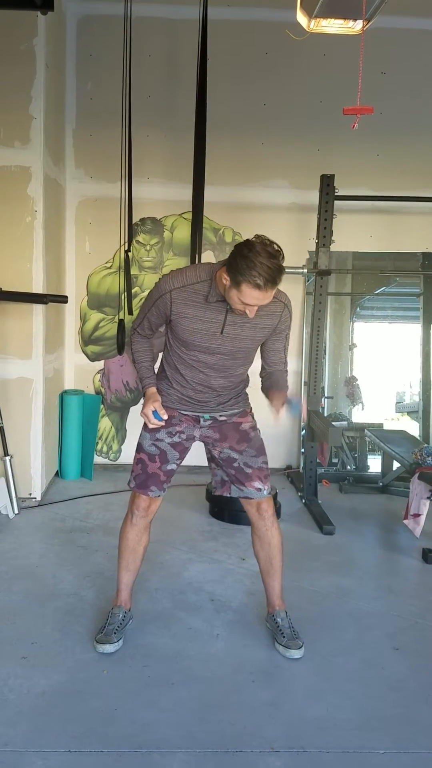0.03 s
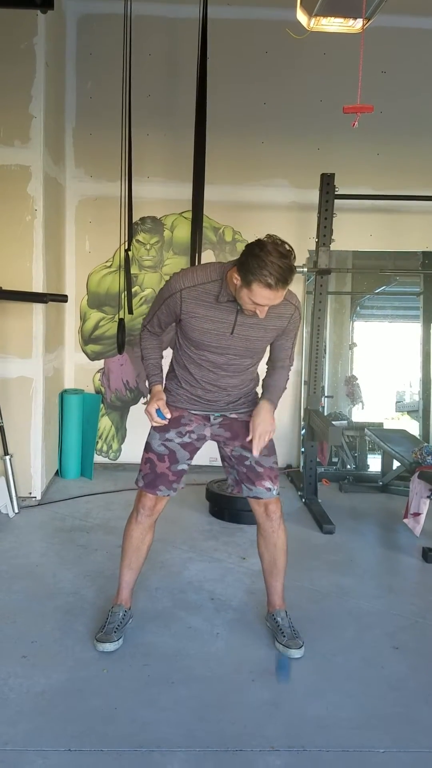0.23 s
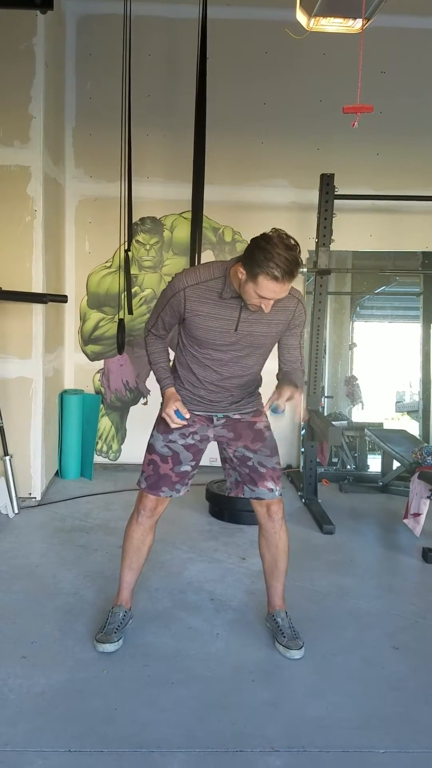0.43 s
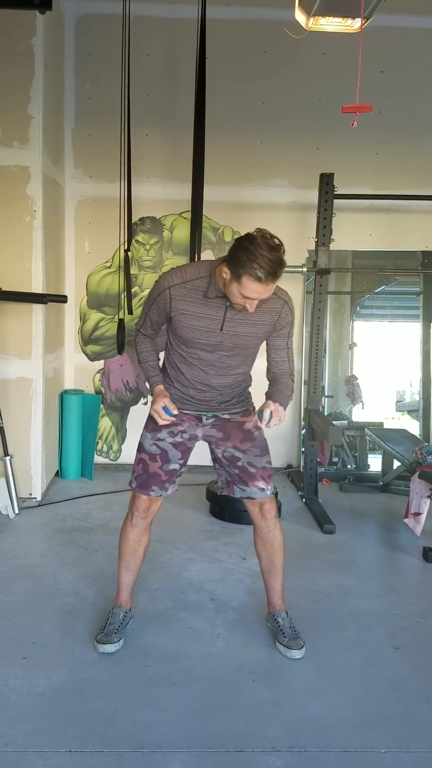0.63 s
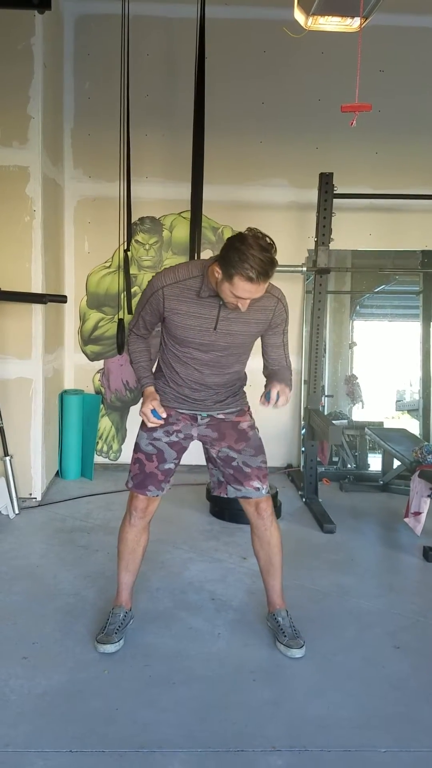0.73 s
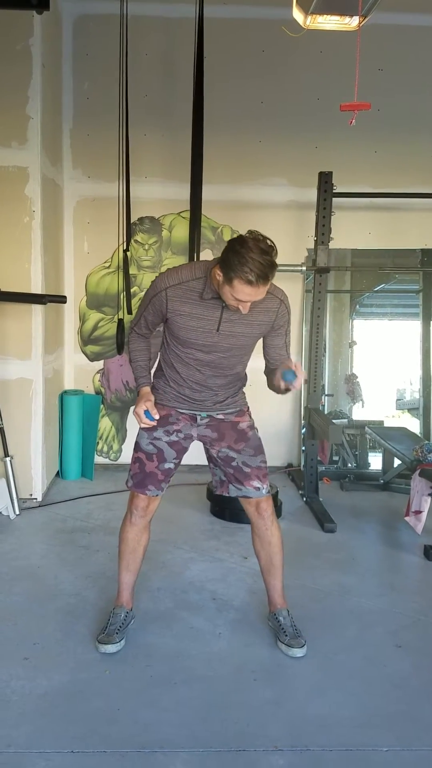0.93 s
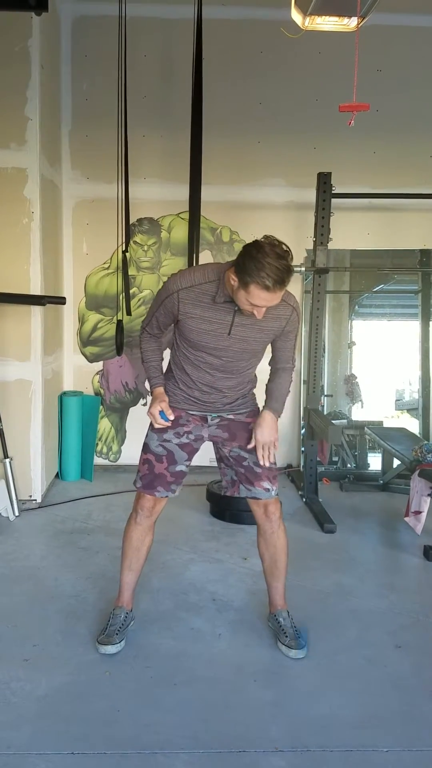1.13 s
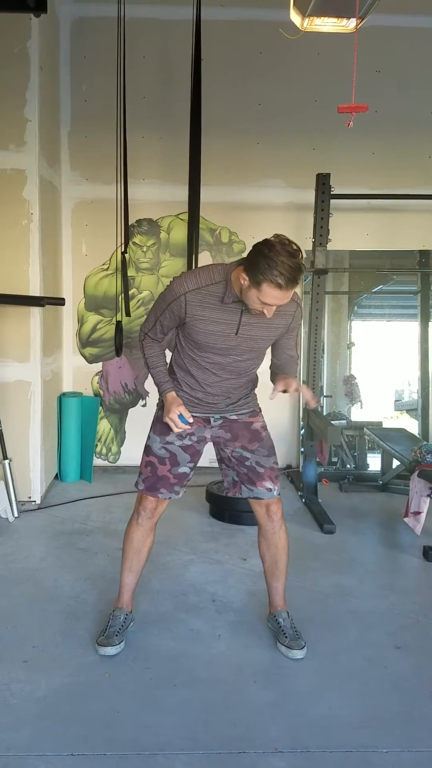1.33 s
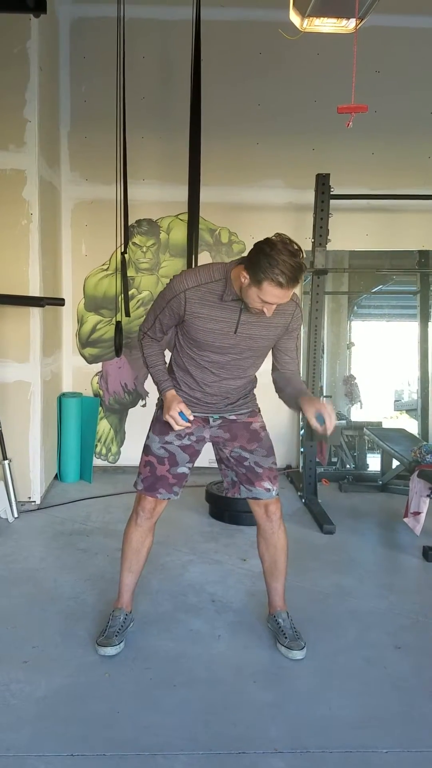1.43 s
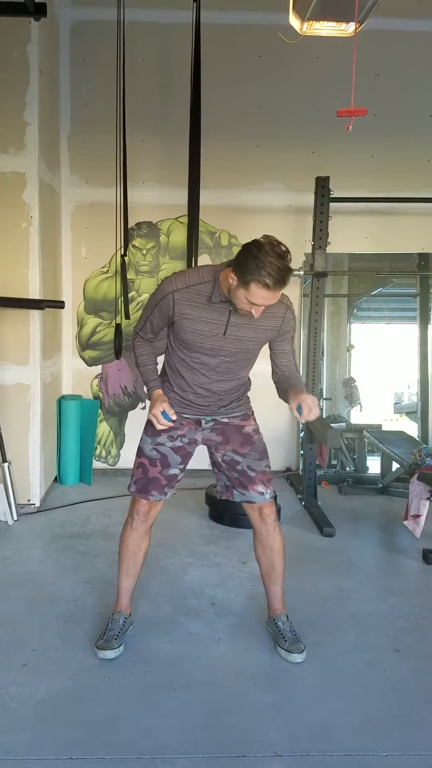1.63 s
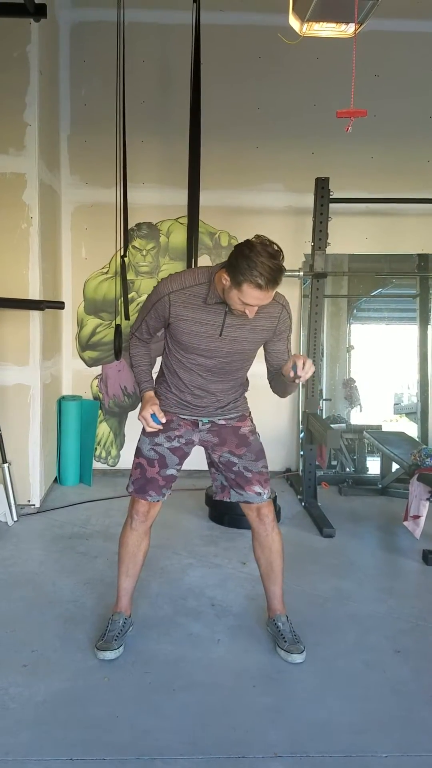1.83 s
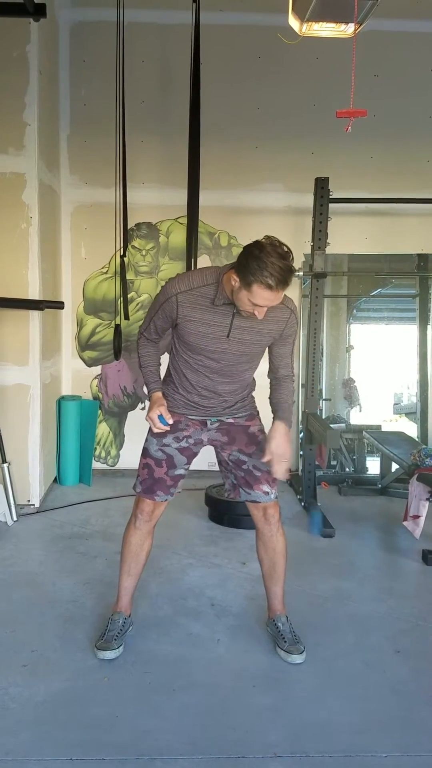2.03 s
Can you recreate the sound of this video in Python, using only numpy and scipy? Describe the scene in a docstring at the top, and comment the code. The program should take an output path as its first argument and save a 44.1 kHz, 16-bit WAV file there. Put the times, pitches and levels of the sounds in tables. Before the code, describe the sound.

A hollow rubber ball slaps a concrete floor and is caught with a soft pop in the palm, then bounces and is caught again. Each hit echoes briefly in a garage, slightly to the right, over a faint low rumble.

```python
"""A faint rumble and a thin, far whistle come first, then a sharp slap: a hollow rubber ball hits a
concrete garage floor. It is thrown twice and caught on each rebound. Each bounce is a slap, a low
thump of the flexing shell and a ping of the air inside; the garage rings on. Each catch is a slide
of skin and a pop of air trapped in the palm. Near the end the hand brushes the ball for the next throw.
The rumble, a low hum and a soft hiss lie under it all."""
import sys
import numpy as np
from scipy import signal
from scipy.fft import rfft, irfft
from scipy.io import wavfile

SR = 44100
rng = np.random.default_rng(int(sys.argv[2]) if len(sys.argv) > 2 else 0)


def waveform_to_disk(signal):
    """Save audio, clipped to [-1, 1], as 16-bit WAV at the path in sys.argv[1]."""
    frames = np.transpose(np.atleast_2d(signal))
    scaled = np.clip(frames, -1, 1) * 32767
    samples = np.round(scaled).astype(np.int16)
    wavfile.write(sys.argv[1], SR, samples)


N = 92610  # 2.1 s

# Table levels are relative. A "fade" is the time a sound takes to drop by 60 dB.
# the ball hits the floor: t/s, level/dB, brightness/(dB per octave)
BOUNCES = [(0.2381, 2, -1), (1.1895, 0.23, 0.2)]
# rubber slapping concrete: f/Hz, level/dB
SLAP_TONE = [(30, -30.5), (70, -25.5), (110, 9.5), (400, -4), (600, -3), (800, -11.5), (1000, 12),
             (1300, -1), (2000, 1.5), (2900, 0), (3700, -11.5), (5000, -9.5), (6300, -40), (8300, -12),
             (9300, -38.5), (15500, -27)]
# notes of the ball's air and shell: f/Hz, level/dB, fade/s
BALL_NOTES = [(1022, -29, 0.077), (1173, -24.5, 0.021), (1365, -39.5, 0.12), (1759, -41.5, 0.092)]
# rubber peeling off grit: f/Hz, level/dB
GRIT_TONE = [(100, -15), (700, -17), (1200, -1.5), (1800, 3), (2800, 1), (3700, -5), (4800, -4),
             (6300, -12), (8000, -11.5), (9500, -20.5), (15000, -19)]
# the hand catches the ball: t/s, level/dB, palm pop level/dB, slide length/s
CATCHES = [(0.4630, -9.5, -1, 0.033), (1.4277, -1.5, 3, 0.012)]
# skin sliding on rubber: f/Hz, level/dB
SLIDE_TONE = [(100, -36), (3000, -27), (6000, -19), (7500, -24), (10000, -33), (13000, -24), (15500, -25)]
# skin hitting rubber: f/Hz, level/dB
SKIN_TONE = [(60, -51), (150, -10), (250, -6.5), (450, -17), (750, -3), (1600, -17.5), (2800, -10.5),
             (4000, -26.5), (7000, -28.5), (10000, -34), (15000, -26)]
# notes of the ball and air pocket in the closing hand: f/Hz, level/dB, fade/s
PALM_NOTES = [(250, -46.5, 0.1), (731, -36.5, 0.01), (1083, -30.5, 0.028), (2587, -46, 0.033)]
# how long the garage echoes: f/Hz, fade/s
ECHO_FADE = [(100, 0.87), (240, .64), (500, 0.58), (1000, 0.84), (1700, 1), (2600, 0.76), (4000, 0.86),
             (8000, 0.68), (15000, 0.42)]
# strength of the echo: f/Hz, level/dB
ECHO_TONE = [(100, -1.5), (170, 2.5), (250, -19.5), (330, 1.5), (600, 4.5), (1000, 5), (2500, 2.5),
             (6000, -0.5), (15000, -3.5)]
# boost or cut at the start of the echo: f/Hz, level/dB
EARLY_TONE = [(200, 6.5), (700, -5), (1200, 4), (3000, 5), (8000, 5.5), (15000, 12.5)]
# the garage's own notes (standing waves): f/Hz, level/dB, fade/s
GARAGE_NOTES = [(157, -70, 0.29), (211.5, -33, 0.28), (237, -45, 0.43), (304.7, -35.5, 0.62)]
# how alike left and right are in sound from all around: f/Hz, likeness/(0 to 1)
LIKENESS = [(50, 1), (250, .93), (450, 0.81), (800, 0.16), (16000, 0)]
# left minus right: f/Hz, level/dB
BALANCE = [(60, 1), (170, -3), (400, 3), (1200, -3), (2700, -6), (5000, 0), (9000, 4), (15000, 3.5)]
# path of the whistle: t/s, f/Hz, level/dB
WHISTLE_PATH = [(0, 1900, -71), (0.072, 1855, -60), (0.131, 1734, -61), (0.197, 1734, -53.5),
                (.27, 1615, -64)]
# background rumble: f/Hz, level/dB
RUMBLE_TONE = [(25, -27), (45, -14.5), (65, -6), (105, -4), (165, -1.5), (230, -9), (320, -7), (450, -10.5),
               (780, -12.5), (1020, -11), (1900, -19), (3600, -34.5), (6000, -41), (15500, -63)]
# slow drift of the rumble and hum: t/s, level/dB
RUMBLE_DRIFT = [(0, 5.5), (.22, 3), (.6, 3), (.9, -1.5), (1.15, 0), (1.599, .5), (2.1, -1)]
# microphone hiss: f/Hz, level/dB
HISS_TONE = [(1000, -6), (4000, -1), (6500, -4.5), (9500, -6), (12500, -1), (15500, 2)]

TIME = np.arange(N) / SR
FREQS = np.fft.rfftfreq(N, 1 / SR)
PEEL_DELAY_S, SLIDE_LEAD_S, GARAGE_NOTES_DELAY_S = 0.0035, 0.003, 0.022
ECHO_TURN_RAD = 0.48  # how much the echo changes from one bounce to the next


def landing(level_db, tilt_db, thump_hz=260.3, thump_rise_s=0.0049, thump_db=-16):
    """The ball slaps down, its shell flexes with a thump and the air inside rings."""
    t = TIME[:SR]
    rise = t / thump_rise_s
    swell = (rise * np.exp(1 - rise)) ** 2.61
    sound = amp(thump_db) * swell * np.cos(2 * np.pi * thump_hz * t)
    add(sound, 0, click(SLAP_TONE, tilt_db))
    return -amp(level_db) * (sound + ring(BALL_NOTES))


def peel(level_db, tilt_db):
    """The rubber crackles off the gritty floor."""
    return amp(level_db) * signal.fftconvolve(crackle(length_s=0.0018), click(GRIT_TONE, tilt_db))


def catch(level_db, pop_db, slide_s, grip_db=6, fingers_s=0.0036, fingers_db=-10.5):
    """The ball slides into the palm; the fingers close on it and trap a pocket of air."""
    touch = amp(grip_db) * crackle(length_s=0.0088)
    touch[0] += 1  # the palm hits first, then the fingers
    add(touch, fingers_s, amp([fingers_db]))
    sound = signal.fftconvolve(crackle(slide_s), click(SLIDE_TONE))
    add(sound, SLIDE_LEAD_S, signal.fftconvolve(touch, click(SKIN_TONE)))
    add(sound, SLIDE_LEAD_S + fingers_s, amp(pop_db) * ring(PALM_NOTES))
    return amp(level_db) * sound


def brush(at_s=1.965, length_s=0.0059, level_db=-66.5):
    """The ball slides off the fingers with a tiny, high swish."""
    swell = np.exp(-((TIME - at_s) / length_s) ** 2)
    return amp(level_db) * swell * noise_band(hz=7600, width_hz=1200)


def garage(delay_s=0.005, rise_s=0.0022, early_s=0.039):
    """The garage's echo of one click: many reflections, each pitch dying at its own speed."""
    taps = rng.standard_normal((2, N)) * (rng.random((2, N)) < 1 / 14)
    for size in (2048, 1024):  # even out the strength over time and pitch
        bands = signal.stft(taps, nperseg=size)[2]
        taps = signal.istft(bands / np.sqrt(abs(bands) + 1e-12), nperseg=size)[1][:, :N]
    hz, t, bands = signal.stft(blend_bass(unit(taps)), SR, nperseg=512)
    rate = np.log(1000) / read(ECHO_FADE, hz)[:, None]
    fade = np.exp(-rate * t) * np.sqrt(2 * rate / SR)  # same energy for short and long fades
    gain_db = read(ECHO_TONE, hz)[:, None] + read(EARLY_TONE, hz)[:, None] * np.exp(-t / early_s)
    onset = np.clip((TIME - delay_s) / rise_s, 0, 1)
    return signal.istft(bands * fade * amp(gain_db), SR, nperseg=512)[1][:, :N] * onset


def whistle(halo_db=3):
    """A faint, thin whistle sinks in pitch inside a halo of noise, then stops."""
    times, hz, db = np.transpose(WHISTLE_PATH)
    level = amp(np.interp(TIME, times, db, right=-np.inf))
    pitch = np.interp(TIME, times, hz)
    pair = [noise_band(pitch, width_hz=30) + amp(halo_db) * noise_band(hz=1760, width_hz=180)
            for _ in range(2)]
    return level * np.array(pair)


def rumble(rumble_db=-57.5, hum_db=-69):
    """A low rumble and a wavering hum drift slowly in loudness."""
    noise = unit(colour(blend_bass(rng.standard_normal((2, N))), RUMBLE_TONE))
    hum = noise_band(hz=102, width_hz=13)
    drift = amp(np.interp(TIME, *np.transpose(RUMBLE_DRIFT)))
    return drift * (amp(rumble_db) * noise + amp(hum_db) * hum)


def hiss(level_db=-71):
    """Faint, steady noise of the two microphones."""
    return amp(level_db) * unit(colour(rng.standard_normal((2, N)), HISS_TONE))


def amp(db):
    """Turns decibels into a number to multiply by."""
    return 10 ** (np.asarray(db) / 20)


def unit(x):
    """Scales a sound to an average power of 1."""
    return x / np.sqrt(np.mean(x ** 2) + 1e-20)


def read(table, hz):
    """Reads between a table's rows, giving each octave equal room."""
    freqs, values = np.transpose(table)
    return np.interp(np.log(hz + 1), np.log(freqs + 1), values)


def add(mix, at_s, sound):
    """Adds a sound to a mix at a given time."""
    part = mix[round(at_s * SR):][:len(sound)]
    part += sound[:len(part)]


def placed(at_s, sound):
    """One sound on an empty track."""
    track = np.zeros(N)
    add(track, at_s, sound)
    return track


def click(tone, tilt_db=0):
    """A click with the given tone, tilted by tilt_db per octave around 1 kHz."""
    hz = abs(np.fft.fftfreq(4096, 1 / SR))
    octaves = np.log2((hz + 1) / 1000)
    log_gain = np.log(amp(read(tone, hz) + tilt_db * octaves))
    spectrum = np.exp(np.conj(signal.hilbert(log_gain)))  # packs the energy at the start
    return np.fft.ifft(spectrum).real


def ring(notes):
    """Struck notes that die away, one second in all."""
    t = TIME[:SR]
    sound = sum(amp(db) * np.exp(-np.log(1000) * t / fade_s) * np.cos(2 * np.pi * hz * t)
                for hz, db, fade_s in notes)
    sound[0] /= 2  # keeps deep bass out
    return sound


def crackle(length_s):
    """A brief crackle with an energy of 1, equally strong at all pitches."""
    t = TIME[:SR]
    swell = t / length_s * np.exp(-2 * t / length_s)
    noise = rng.standard_normal(SR)
    for _ in range(6):  # shape it in time, then even out its tone
        spectrum = rfft(noise * np.sqrt(swell))
        noise = irfft(spectrum / (abs(spectrum) + 1e-12), SR)
    return unit(noise * (t < 5 * length_s)) / np.sqrt(SR)


def noise_band(hz, width_hz):
    """Noise gathered around one pitch, which may move."""
    damping = np.exp(-np.pi * width_hz / SR)
    noise = rng.standard_normal(N) + 1j * rng.standard_normal(N)
    waver = signal.lfilter([1], [1, -2 * damping, damping ** 2], noise)
    cycles = np.cumsum(hz * np.ones(N)) / SR
    return unit((waver * np.exp(2j * np.pi * cycles)).real)


def colour(x, tone, share=1):
    """Turns each pitch up or down by a share of a table's decibels."""
    gain = amp(share * read(tone, np.fft.rfftfreq(2 * N, 1 / SR)))
    return irfft(rfft(x, 2 * N) * gain)[..., :N]


def blend_bass(pair):
    """Makes two unrelated sounds alike in the bass, as at two close microphones."""
    a, b = rfft(pair)
    angle = np.arccos(np.clip(read(LIKENESS, FREQS), -1, 1)) / 2
    shared, apart = a * np.cos(angle), b * np.sin(angle)
    return irfft(np.array([shared + apart, shared - apart]), N)


def reflect(x, echo):
    """The garage's answer to a sound."""
    return signal.fftconvolve(x[None], echo, axes=1)[:, :N]


def to_the_right(x, lag_s=0.0001, half_lag_hz=2650):
    """Sound from the right reaches the left side later, less so in the treble."""
    delay_s = lag_s / (1 + FREQS / half_lag_hz)
    left = irfft(rfft(x) * np.exp(-2j * np.pi * FREQS * delay_s), N)
    return np.array([left, x])


def scene():
    """Bounces and hand sounds, a little to the right, echo in the garage over the background."""
    hand = brush()
    for at_s, db, pop_db, slide_s in CATCHES:
        hand += placed(at_s - SLIDE_LEAD_S, catch(db, pop_db, slide_s))
    direct = hand
    echoes = amp(-2.5) * reflect(hand, garage())
    echo_a, echo_b = garage(), garage()
    for k, (at_s, db, tilt_db) in enumerate(BOUNCES):
        down = placed(at_s, landing(db, tilt_db))
        up = placed(at_s + PEEL_DELAY_S, peel(db, tilt_db))
        direct = direct + down + up
        keep, change = np.cos(k * ECHO_TURN_RAD), np.sin(k * ECHO_TURN_RAD)
        echoes += reflect(down, keep * echo_a + change * echo_b)
        echoes += reflect(up, keep * echo_b - change * echo_a)
        echoes += placed(at_s + GARAGE_NOTES_DELAY_S, amp(db) * ring(GARAGE_NOTES))
    ball = colour(to_the_right(direct) + echoes, BALANCE, share=np.array([[0.5], [-0.5]]))
    return ball + rumble() + hiss() + whistle()


def record(dry, cut_hz=16000):
    """Cuts off the very highest treble."""
    low_pass = signal.firwin(511, cut_hz, window=("kaiser", 9), fs=SR)
    return signal.oaconvolve(dry, low_pass[None], "same")


dry = scene()
out = record(dry)
waveform_to_disk(out)
```